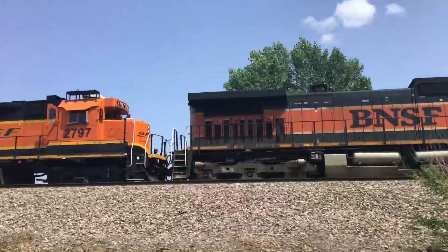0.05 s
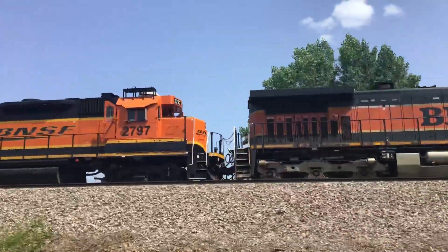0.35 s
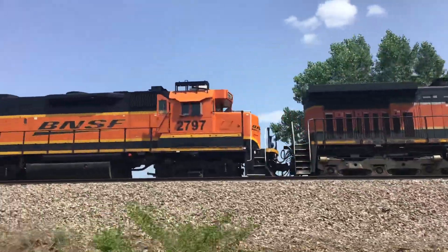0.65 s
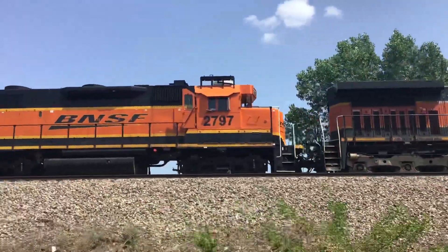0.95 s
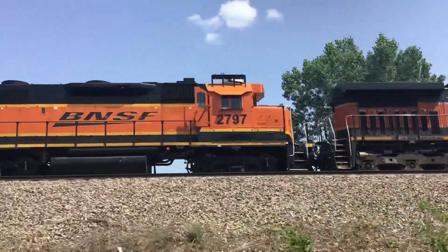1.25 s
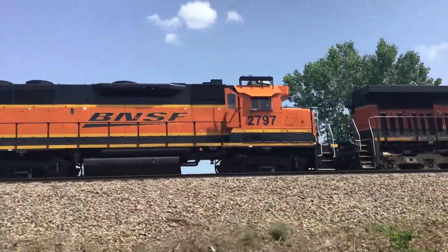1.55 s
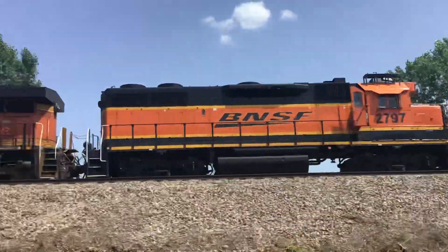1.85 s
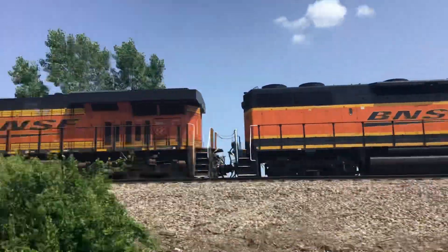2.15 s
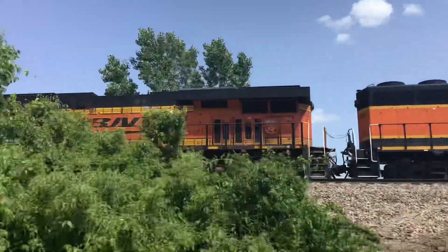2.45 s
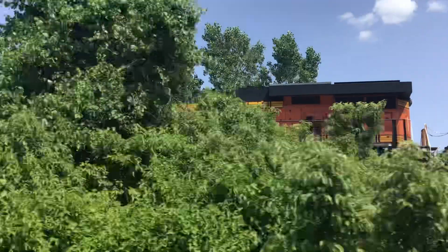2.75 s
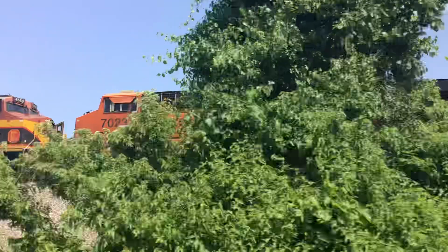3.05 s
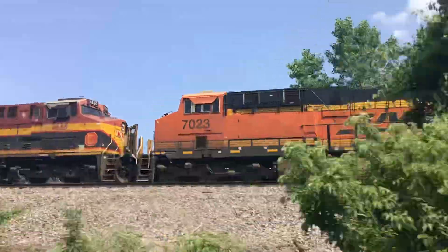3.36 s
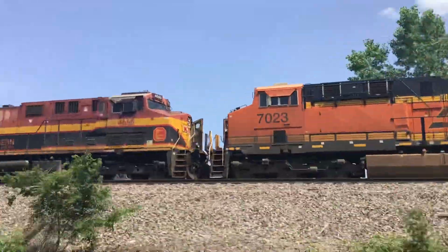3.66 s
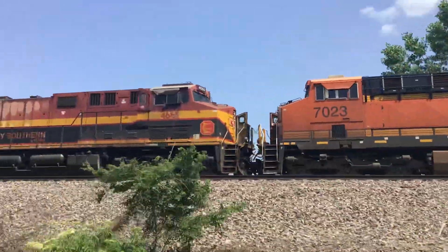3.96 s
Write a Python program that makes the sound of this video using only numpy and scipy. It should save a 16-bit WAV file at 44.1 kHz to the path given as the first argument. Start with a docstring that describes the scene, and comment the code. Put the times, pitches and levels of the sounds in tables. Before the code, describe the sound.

A car cabin rumbles with buffeting wind as idling locomotives drone and spit air outside.

```python
"""A low boom swells and sinks in the cabin of a car driving along a line of idling diesel locomotives.
One microphone rides inside, where buffeting air stirs the cabin's resonance over tyre and wind noise.
From outside come the engines' wavering drone and a roar that swells in passing. About twice a second
there is a short spit, like air from a drain valve, much louder towards the end.
A few tiny ticks sound close by."""
import sys
import numpy as np
from scipy import signal
from scipy.fft import rfft, irfft
from scipy.io import wavfile
from scipy.ndimage import uniform_filter1d

SR = 44100
rng = np.random.default_rng(int(sys.argv[2]) if len(sys.argv) > 2 else 0)


def unload_wav(signal):
    """Save mono or channel-first audio to the path in sys.argv[1] as 16-bit WAV at rate SR, clipped to [-1, 1]."""
    wavfile.write(
        sys.argv[1],
        SR,
        np.round(np.clip(np.atleast_2d(signal).T, -1, 1) * 32767).astype(np.int16),
    )


N = 176400
TIME = np.arange(N) / SR

# thin air hiss at the window, and the sing within it: time_s, level_db
WINDOW_HISS_LEVEL = [(0, -59), (1.5, -60), (2.6, -56.5), (3.3, -57.5), (4, -55.5)]


def from_db(db):
    """Decibels to gain."""
    return 10 ** (np.asarray(db) / 20)


def unit_rms(x):
    """Scale to unit rms."""
    return x / np.sqrt(np.mean(x ** 2) + 1e-20)


def level(rows):
    """Gain over time from rows of time_s, level_db."""
    return from_db(np.interp(TIME, *np.transpose(rows)))


def drift(rate_hz):
    """Smooth random motion with spread 1."""
    hz = np.arange(N // 2 + 1) * SR / N
    return unit_rms(irfft(rfft(rng.standard_normal(N)) / (1 + (hz / rate_hz) ** 2) ** 2, N))


def noise(spectrum, shape=lambda hz: 1):
    """Unit-rms noise coloured by rows of frequency_hz, density_db, optionally shaped further."""
    hz = np.maximum(np.arange(N // 2 + 1) * SR / N, 1)
    points_hz, points_db = np.transpose(spectrum)
    gain = from_db(np.interp(np.log(hz), np.log(points_hz), points_db))
    skirts = np.minimum(hz / points_hz[0], 1) ** 2 * np.minimum(points_hz[-1] / hz, 1) ** 2
    return unit_rms(irfft(rfft(rng.standard_normal(N)) * gain * skirts * shape(hz), N))


def treble_band(centre_hz, width_hz):
    """A bell-shaped band of high noise at unit rms."""
    return noise([(3000, 0), (16000, 0)], lambda hz: np.exp(-((hz - centre_hz) / width_hz) ** 2))


def evened(x, window_s):
    """Take the slow chance swells out of a noise."""
    return x / np.sqrt(uniform_filter1d(x ** 2, max(int(window_s * SR), 1)) + 1e-9)


def tone(hz):
    """Unit-rms sine that follows a pitch curve."""
    return np.sqrt(2) * np.sin(2 * np.pi * (np.cumsum(hz) / SR + rng.random()))


def resonance(x, hz, width_hz):
    """Two-pole resonance with gain 1 at its peak."""
    radius = np.exp(-np.pi * width_hz / SR)
    feedforward = np.array([1, 0, -1]) * (1 - radius ** 2) / 2
    feedback = [1, -2 * radius * np.cos(2 * np.pi * hz / SR), radius ** 2]
    return signal.lfilter(feedforward, feedback, x + 1e-18)


def cabin_boom():
    """Buffeting air excites the cabin's low resonance in swells, all around the microphone."""
    # swells of the boom: time_s, level_db
    swells = [(0, -25), (.09, -27), (.19, -39), (.30, -26.5), (.55, -41), (.75, -42.5), (.83, -24.5),
              (.94, -37.5), (1.07, -28.5), (1.25, -35), (1.40, -22.5), (1.52, -28), (1.65, -35.5),
              (1.78, -25.5), (1.88, -41), (1.98, -31.5), (2.10, -36.5), (2.20, -28.5), (2.35, -41),
              (2.57, -29), (2.67, -32.5), (2.74, -25), (2.84, -26.5), (2.93, -35), (3.0, -26), (3.19, -38),
              (3.44, -30), (3.63, -37), (3.74, -30), (3.85, -40.5), (3.94, -24), (4, -43)]
    # colour of the boom: frequency_hz, density_db
    colour = [(25, -57), (40, -32), (50, -22), (62, -6), (73, 4.5), (84, -4.5), (100, -11.5), (140, -44.5)]
    pitch_hz, wander_hz = 74.13, 4.96
    ring = from_db(-4) * tone(pitch_hz + wander_hz * drift(17.6))
    buffeting = from_db(-4.5) * noise(colour)
    return from_db(-1.5) * level(swells) * evened(ring + buffeting, window_s=0.1)


def road_and_wind():
    """Road rumble and the rush of tyres and wind, heard from inside, with air hissing at the window."""
    # colours of rumble, rush and hiss: frequency_hz, density_db
    rumble_colour = [(25, -30), (50, -23.5), (75, 2), (100, 2.5), (165, 1), (205, -3), (240, -9),
                     (295, -7.5), (340, -13), (450, -21), (700, -29.5), (1500, -51)]
    rush_colour = [(200, -11.5), (400, -1), (520, 1), (720, -3), (900, -3), (1080, -9.5), (1190, -5),
                   (1350, -9.5), (1700, -13), (2100, -20.5), (3000, -28.5), (4500, -31), (8000, -76)]
    hiss_colour = [(1500, 3.5), (2600, 4.5), (3100, 1.5), (3800, 4.5), (4700, -10.5), (5400, -7.5),
                   (6400, -8.5), (7200, -19), (8300, -19), (9400, -18.5), (10500, -24.5), (16000, -27.5)]
    # rumble and rush along the drive: time_s, level_db
    rumble_level = [(0, -36.5), (.6, -34.5), (1.1, -31.5), (1.6, -34), (2.3, -33), (2.9, -32.5), (3.3, -34),
                    (3.5, -31.5), (4, -36)]
    rush_level = [(0, -44.5), (.6, -45), (1.0, -44.5), (1.4, -44.5), (1.75, -43), (2.4, -43.5),
                  (3.3, -43.5), (4, -42.5)]
    rumble = level(rumble_level) * evened(noise(rumble_colour), window_s=0.22)
    rush = from_db(1.1) * level(rush_level) * noise(rush_colour)
    hiss = level(WINDOW_HISS_LEVEL) * noise(hiss_colour)
    return rumble + rush + hiss


def locomotives():
    """The diesels idling outside: a drone of wavering partials and a roar that swells in passing."""
    # engine partials: pitch_hz, level_db
    partials = [(124, -40), (172, -46), (205, -48), (297, -56), (501, -60)]
    # colour of the roar: frequency_hz, density_db
    roar_colour = [(600, -15), (800, -2.5), (930, 1.5), (1080, -6.5), (1180, 0), (1400, -19), (1850, -17.5),
                   (2150, -16.5), (2600, -16), (3100, -23.5), (3700, -16.5), (4500, -38.5)]
    # drone and roar as the car passes: time_s, level_db
    drone_level = [(0, 2.5), (1.1, 0), (1.5, -6.5), (2.0, -6), (2.3, 4.5), (3.0, 3), (3.3, -6.5), (4, 0.5)]
    roar_level = [(0, -68), (.55, -56.5), (.95, -49), (1.4, -50), (1.75, -48.5), (2.1, -49.5), (2.6, -52.5),
                  (3.3, -58), (4, -54)]
    wander_share, flutter_db = .012, 1.5
    drone = np.zeros(N)
    for hz, db in partials:
        gain = from_db(db + flutter_db * drift(5.7))
        drone += gain * tone(hz * (1 + wander_share * drift(10)))
    return level(drone_level) * drone + level(roar_level) * noise(roar_colour)


def sizzle():
    """Faint treble bands flicker independently, at the start and towards the end."""
    # bands of the sizzle: centre_hz, level_db
    bands = [(4600, 2), (7600, -1.5), (8400, -6), (9300, -2), (10200, -12), (11000, -4), (12000, -4),
             (12900, -5.5), (13800, -10)]
    # its fade and return: time_s, level_db
    fade = [(0, -85.5), (.28, -87), (.45, -100), (2.9, -100), (3.3, -90), (4, -88)]
    flicker_db = 3.5
    treble = sum(from_db(db + flicker_db * drift(25)) * treble_band(hz, width_hz=550) for hz, db in bands)
    return level(fade) * treble


def thin_sing():
    """A narrow high band wavers in strength and grows with the hiss at the window."""
    flicker_db = 4
    wavering = from_db(-17.5 + flicker_db * drift(30))
    return level(WINDOW_HISS_LEVEL) * wavering * treble_band(centre_hz=6160, width_hz=570)


def spits():
    """Each spit opens abruptly, builds as it sputters, then dies with a thin ring and its own whistle."""
    # spits: start_s, level_db, hold_s, decay_s (time constant), centre_hz, treble_db, whistle_hz
    events = [(0.38, -50.5, 0.011, 0.0092, 5400, 1.5, 5980), (0.781, -54.5, .011, 0.012, 3900, -2, 3800),
              (1.209, -61.5, .012, .014, 5200, 4, 5400), (1.694, -55, 0.0076, 0.0084, 4200, 2, 3350),
              (2.127, -54, 0.015, 0.021, 5240, 0.5, 5100), (2.657, -51.5, 0.017, 0.016, 5400, 1, 5440),
              (2.945, -40, 0.0098, 0.012, 5800, -7.5, 5440), (3.352, -31.5, 0.0083, 0.012, 6060, -3, 3270),
              (3.905, -31, 0.018, 0.017, 5300, 0, 5100)]
    # broad resonances that colour every spit: frequency_hz, density_db
    colour = [(1200, -29), (2200, -4), (2900, -10), (3500, -1.5), (4200, -6.5), (5300, -3), (6300, 0),
              (7100, -12.5), (7800, -18), (8700, -17.5), (9400, -9), (10200, -18), (13200, -13),
              (14700, -11), (16000, -16)]
    # narrow rings that every spit excites: pitch_hz, width_hz, gain_db
    rings = [(2710, 39, 7.5), (3250, 43, -6.5), (3880, 31, 1.5), (4500, 25, 4), (5210, 10, -3),
             (5630, 67, -6), (5720, 30, -1), (6470, 35, -7), (7300, 38, 1.5), (9180, 80, 0),
             (14700, 160, -4)]
    attack_s, opening_share, sputter_db = 0.0018, 0.3, 1
    skirt_db, treble_from_hz = -1.5, 8000
    tail_db, tail_s = -23.5, 0.063
    out = np.zeros(N)
    for start_s, db, hold_s, decay_s, centre_hz, treble_db, whistle_hz in events:
        def own_colour(hz):
            hump = np.exp(-np.log2(hz / centre_hz) ** 2)  # about an octave to each side
            return (hump + from_db(skirt_db)) * from_db(treble_db * (hz > treble_from_hz))
        age = TIME - start_s
        opening = np.clip(age / attack_s, 0, 1)
        building = np.interp(age, [0, 1.26 * hold_s], [opening_share, 1])
        since_hold = np.maximum(age - hold_s, 0)
        dying = np.exp(-since_hold / decay_s) + from_db(tail_db) * np.exp(-since_hold / tail_s)
        sputter = from_db(db + sputter_db * drift(600))
        burst = sputter * opening * building * dying * noise(colour, own_colour)
        out += burst + resonance(burst, whistle_hz, width_hz=64)
    return out + sum(from_db(db) * resonance(out, hz, width_hz) for hz, width_hz, db in rings)


def ticks():
    """Tiny bright contacts near the microphone, over in a millisecond; some have a duller body too."""
    # dry ticks: start_s, level_db, body_share (0-1)
    contacts = [(1.295, -45.5, 0), (1.606, -46, 0), (1.843, -55, 0), (2.880, -56, .5), (2.8854, -40, 1),
                (2.889, -46, 1), (3.672, -46.5, 0.3)]
    # colours of the bright edge and the body: frequency_hz, density_db
    edge_colour = [(5000, -16), (7500, -13), (9400, 5), (12000, -5), (16000, -2)]
    body_colour = [(1500, -14), (3500, 15), (6000, 0), (8000, -21)]
    decay_s = 0.00052
    edge, body = noise(edge_colour), noise(body_colour)
    out = np.zeros(N)
    for start_s, db, body_share in contacts:
        envelope = (TIME >= start_s) * np.exp(-np.abs(TIME - start_s) / decay_s)
        out += from_db(db) * envelope * (edge + body_share * body)
    return out


def scene():
    """Everything as it reaches the one microphone in the cabin."""
    return (cabin_boom() + road_and_wind() + locomotives() + sizzle() + thin_sing() + spits() + ticks())[None]


def record(dry):
    """The top is cut steeply."""
    cutoff_hz = 15900
    return signal.sosfilt(signal.ellip(12, .1, 80, cutoff_hz, fs=SR, output="sos"), dry)


dry = scene()
out = record(dry)
unload_wav(out)
```